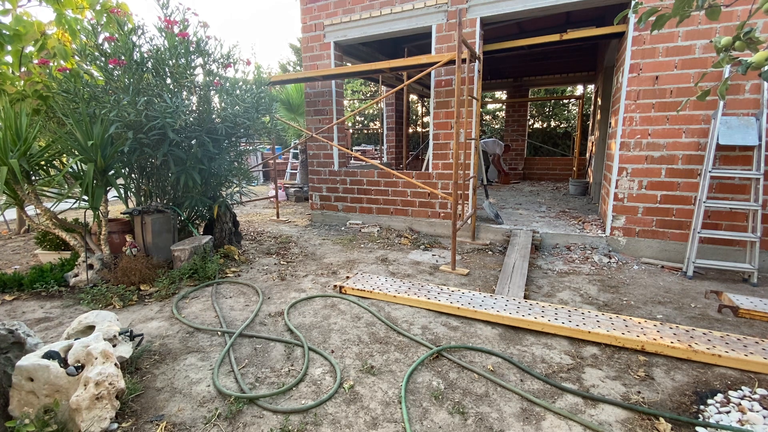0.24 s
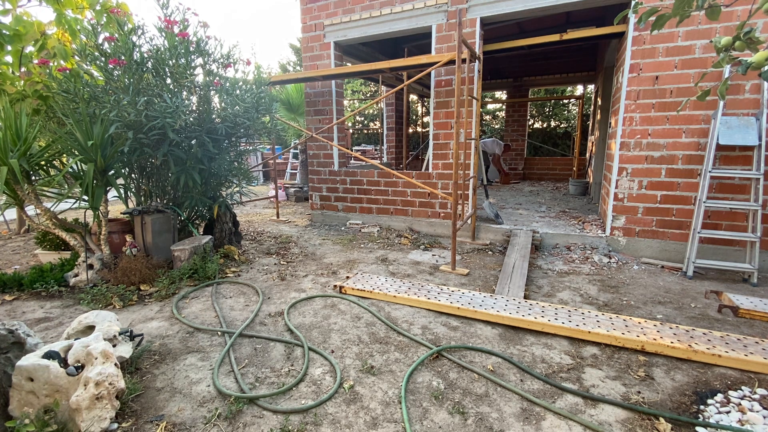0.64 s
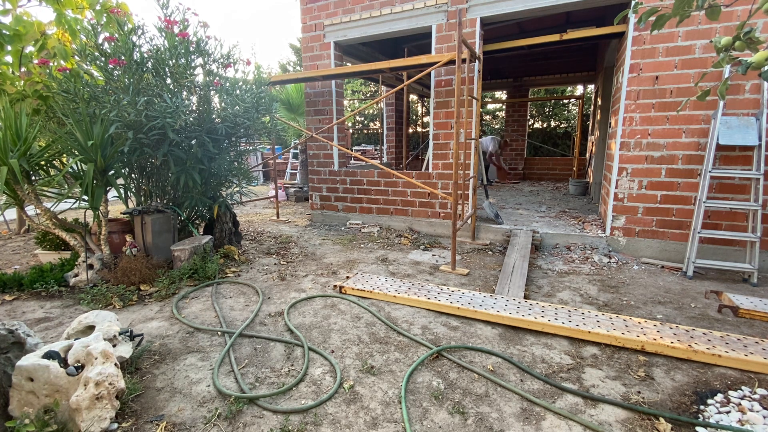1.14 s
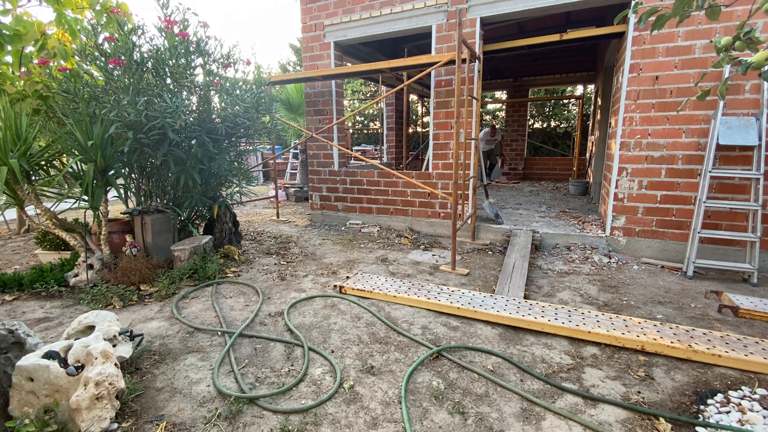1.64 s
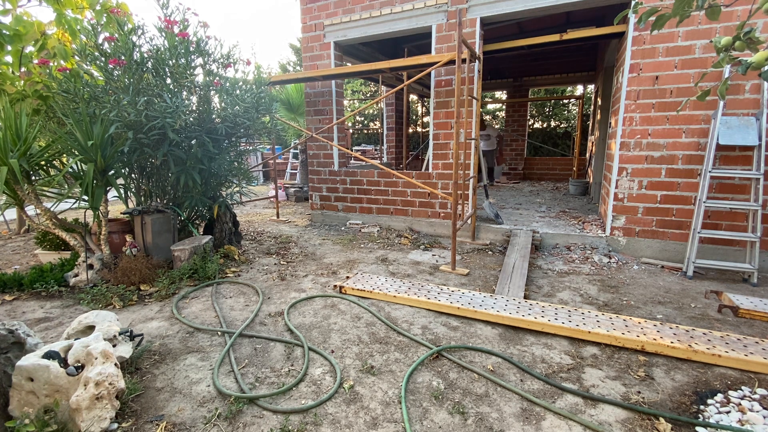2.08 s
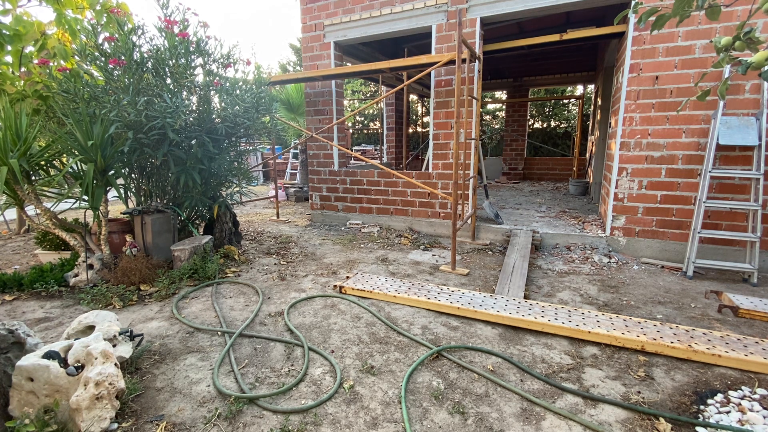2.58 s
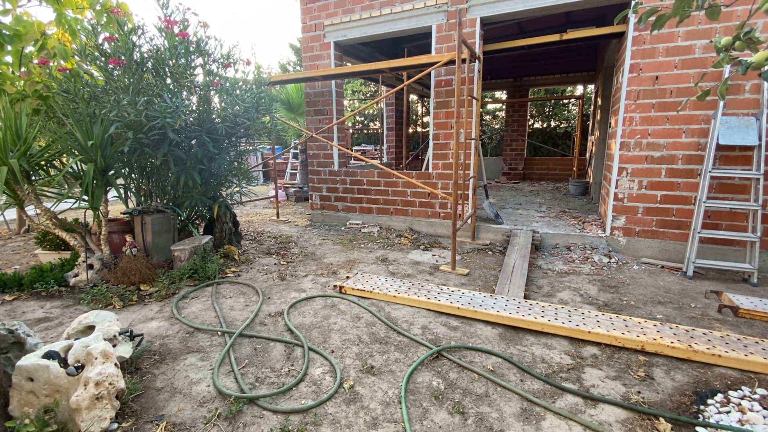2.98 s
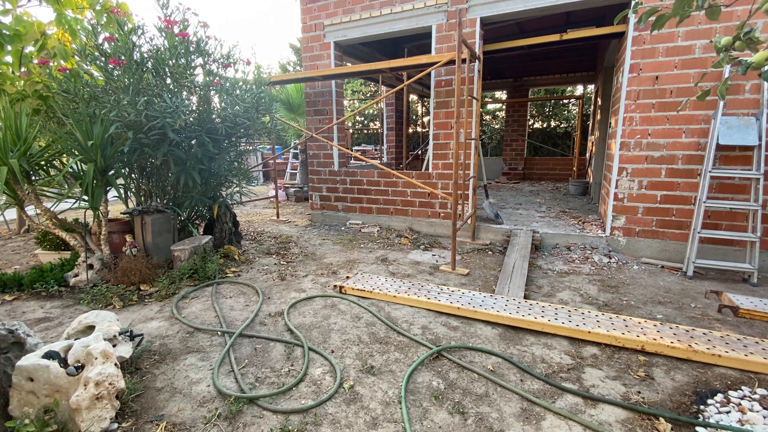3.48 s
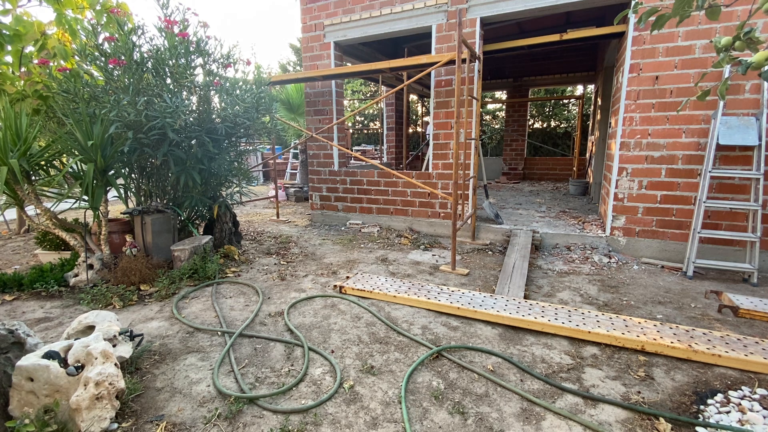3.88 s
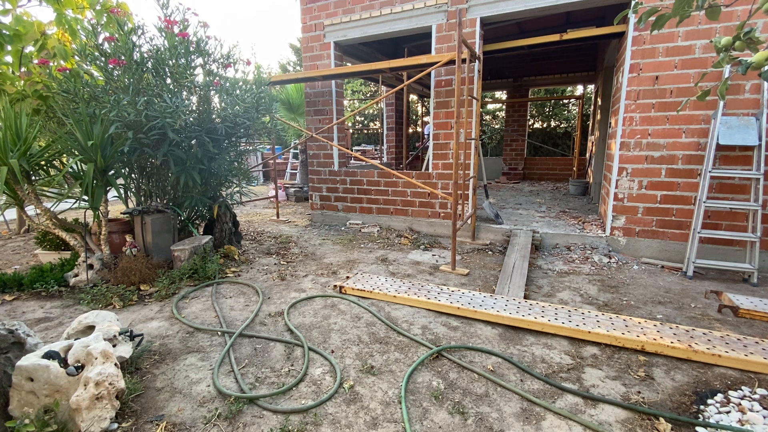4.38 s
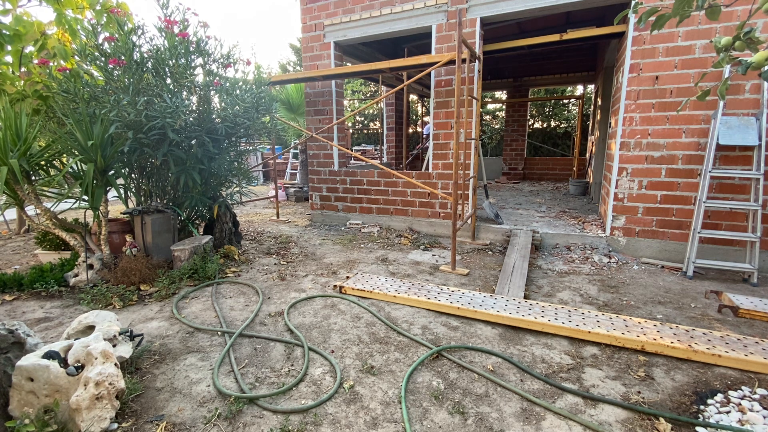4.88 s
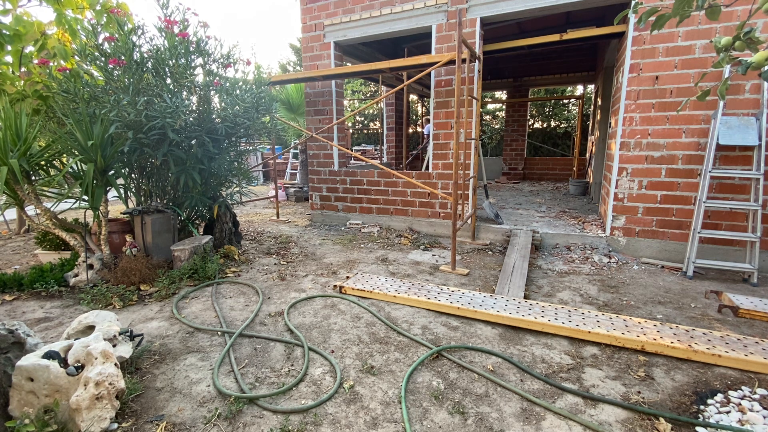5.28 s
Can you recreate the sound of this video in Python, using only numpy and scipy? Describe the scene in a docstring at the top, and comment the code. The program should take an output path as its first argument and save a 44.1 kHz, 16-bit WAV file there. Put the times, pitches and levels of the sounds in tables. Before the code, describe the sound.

Heard from a quiet yard, a steel part scrapes over concrete in the doorway of a bare brick house, clanks loudly, squeals briefly and knocks hollowly. Boots scuff grit with soft thuds. Deeper inside, a metal platform is shoved with a low rumble, then lands in a double clatter and rings out. Stereo microphones outside, short room reverberation.

```python
"""In the doorway of a bare brick house, heard from the yard, scaffolding parts are handled.
A steel part is dragged, clanks and knocks; grit scuffs on the concrete floor; then, deeper in the room,
a platform is shoved along and dropped with a double clatter. Impacts excite modal bodies with an impulse
and dying chatter, friction is a dense train of random slips, squeals are wavering sines, and the open
air is filtered noise; paths of direct sound, first bounces and room tail carry all but the air."""
import sys
import numpy as np
from scipy import signal
from scipy.fft import rfft, irfft, next_fast_len
from scipy.io import wavfile
from scipy.ndimage import uniform_filter1d

SR = 44100
rng = np.random.default_rng(int(sys.argv[2]) if len(sys.argv) > 2 else 0)


def output_pcm(signal):
    """Save a mono or channel-first signal as 16-bit PCM at the path in sys.argv[1].

    Samples are clipped to [-1, 1] before scaling.
    """
    pcm = np.clip(np.atleast_2d(signal).T, -1, 1) * 32767
    wavfile.write(sys.argv[1], SR, np.round(pcm).astype(np.int16))


N = 243856
TAPS = 16384  # length of an object's impulse response, samples
HZ, TIME = np.fft.rfftfreq(TAPS, 1 / SR), np.arange(N) / SR

# broad spectral colour of the steel part: [f/Hz, level/dB]
STEEL_COLOUR = [(60, -34), (300, -22.5), (520, -23), (850, -4.5), (1300, 0), (1700, -4.5), (2200, -8.5),
                (2600, -11.5), (3200, -12.5), (3800, -21), (4600, -19), (7300, -29.5), (10000, -42.5),
                (16000, -49)]
# vibration modes of the steel part: [f/Hz, width/Hz, level above the colour/dB]
STEEL_PART_MODES = [(648.5, 28, 6.8), (820, 16, 3), (856, 67, 6.2), (860, 20, 1.8), (1200, 27, 11),
                    (1293, 54, 8.9), (1609, 30, 8.2), (1756, 29, 13), (1986, 18, 4.3), (2570, 13, 14),
                    (2790, 26, 3), (3320, 89, 5.9), (7040, 470, 6.5)]
# colour of fine gritty hiss: [f/Hz, level/dB]
HISS_COLOUR = [(2000, -25.5), (5000, 0), (7500, -4.5), (11000, 0.5), (15500, -12.5), (17000, -19.5)]
HISS_LINGER = 0.85  # fall time of gritty hiss as a multiple of the push's own


def amp(db):
    """Level to gain: twenty decibels are a factor of ten in amplitude."""
    return 10 ** (np.asarray(db) / 20)


def evened(x):
    """Normalisation to unit root mean square."""
    return x / np.sqrt(np.mean(x ** 2) + 1e-20)


def packed(sound):
    """Energy normalisation: rms 1 if all the energy were packed into 10 ms."""
    return sound / np.linalg.norm(sound) * np.sqrt(SR / 100)


def read(points, hz):
    """Linear interpolation of a spectrum on a logarithmic frequency axis."""
    f, value = np.transpose(points)
    return np.interp(np.log(hz + 1), np.log(f + 1), value)


def add(mix, s, sound):
    """Superposition: lays a sound into the mix at time s."""
    part = mix[max(round(s * SR), 0):][:len(sound)]
    part += sound[:len(part)]


def causal(gain):
    """Minimum phase: folding the cepstrum gives the causal impulse response with this gain."""
    cepstrum = irfft(np.log(gain))
    cepstrum[..., 1:TAPS // 2] *= 2
    cepstrum[..., TAPS // 2 + 1:] = 0
    return irfft(np.exp(rfft(cepstrum)))


def body(colour, modes=(), tilt_db=0):
    """Modal resonance: Lorentzian peaks stand out of a broad colour, tilted in dB per octave."""
    peaks = 1 + sum(amp(db) ** 2 / (1 + (2 * (HZ - hz) / width) ** 2) for hz, width, db in modes)
    octaves = np.log2(np.clip(HZ, 250, 8000) / 1000)
    return causal(amp(read(colour, HZ) + tilt_db * octaves) * np.sqrt(peaks))


def blow(response, db, chatter, contact=0.32):
    """Impact excitation: one contact impulse and a decaying noise of smaller ones drive a body."""
    t = np.arange(SR // 10) / SR
    force = rng.standard_normal(len(t)) * np.exp(-t / max(chatter, 1e-5)) * (1 - np.exp(-t / 0.001)) * 0.16
    force[0] = contact
    sound = signal.fftconvolve(force, response)
    return amp(db) * packed(sound)


def ring(colour, modes, rise):
    """Free vibration: each mode decays at a rate set by its width, after a gradual onset."""
    t = TIME[:SR]
    sound = np.zeros(len(t))
    for hz, width, db in modes:
        decay = np.exp(-np.pi * width * t)
        sound += amp(read(colour, hz) + db) * decay * np.sqrt(width) * np.sin(2 * np.pi * hz * t)
    return packed(sound * (1 - np.exp(-t / rise)))


def rub(response, per_s, spread_db):
    """Friction noise: a dense random train of unequal slips drives a body, rms 1."""
    size = amp(spread_db * np.minimum(rng.exponential(1, N), 4))
    slips = size * rng.choice([-1., 1.], N) * (rng.random(N) < per_s / SR)
    return evened(signal.oaconvolve(slips, response)[:N])


def stroke(peak, rise, fall):
    """Exponential envelope of one push: 20 dB up in each rise time, 20 dB down in each fall time."""
    before = (peak - TIME) / max(rise, 0.005)
    after = (TIME - peak) / max(fall, 0.005)
    return 10 ** -np.maximum(before, after).clip(0, 10)


def strokes(rows, lingers):
    """Power addition of pushes: a gain curve per friction layer; lingers stretch each layer's fall."""
    curves = []
    for k, linger in enumerate(lingers):
        power = sum((amp(dbs[k]) * stroke(peak, rise, fall * linger)) ** 2
                    for peak, rise, fall, *dbs in rows)
        curves.append(np.sqrt(power))
    return curves


def pair(two):
    """Interchannel coherence: mixing two unrelated signals makes a microphone pair, most alike in the bass."""
    # correlation of diffuse sound at the microphones: [f/Hz, coherence]
    likeness = [(80, 0.89), (350, 0.6), (900, -0.55), (2000, 0.19), (4500, 0.18), (12000, -0.63)]
    size = two.shape[1]
    a, b = rfft(two)
    same = np.clip(read(likeness, np.fft.rfftfreq(size, 1 / SR)), -1, 1)
    mid, side = a * np.sqrt((1 + same) / 2), b * np.sqrt((1 - same) / 2)
    return irfft([mid + side, mid - side], size)


def reflections(shrink, onset):
    """Diffuse reverberation: noise decays by frequency band; shrink scales every decay time."""
    # reverberation time of the brick room at shrink 1: [f/Hz, t60/s]
    decay_times = [(100, 0.86), (400, .52), (1500, 0.39), (4000, 0.39), (12000, 0.061)]
    hz, t, z = signal.stft(pair(rng.standard_normal((2, SR))), SR, nperseg=256)
    decay = amp(-60 * t / (shrink * read(decay_times, hz)[:, None]))
    tail = signal.istft(z * decay, SR, nperseg=256)[1]
    tail = tail * (1 - np.exp(-np.arange(tail.shape[1]) / SR / onset))
    power = abs(rfft(tail, TAPS * 4)[:, 1000:4000]) ** 2  # about 0.7 to 2.7 kHz
    return tail / np.sqrt(power.mean())


def place(x, direct_db, early_db, late_db, right, lag_ms):
    """Room acoustics: direct sound, first bounces and tail, with level and time differences in stereo."""
    # left minus right level at right = 1: [f/Hz, level/dB]
    doorway = [(100, -3), (400, -6), (700, -4), (1200, -6), (1900, -0.5), (4500, 2)]
    early = amp(early_db) * reflections(shrink=0.15, onset=0.003)
    paths = early + amp(late_db) * reflections(shrink=1, onset=0.0085)
    paths[:, 0] += amp(direct_db)
    # the many paths smear the sound in time but leave its colour even
    power = uniform_filter1d(abs(rfft(paths, TAPS)) ** 2, size=19, axis=1)
    total = amp(direct_db) ** 2 + amp(early_db) ** 2 + amp(late_db) ** 2
    paths = signal.fftconvolve(paths, causal(np.sqrt(total / (power + 1e-9))), axes=1)
    size = next_fast_len(N + 2 * SR, True)
    hz = np.fft.rfftfreq(size, 1 / SR)
    # half of each difference goes to either channel; the left lags
    lean = amp(right * read(doorway, hz) / 2) * np.exp(-1j * np.pi * hz * lag_ms / 1000)
    return irfft(rfft(x, size) * rfft(paths, size) * np.array([lean, 1 / lean]), size)[:, :N]


def air():
    """Broadband noise filtering: quiet outdoor air over a soft low rumble that swells and ebbs."""
    # colour of the outdoor air: [f/Hz, level/dB]
    air_colour = [(15, -42), (27, -18.5), (42, 0), (65, -5.5), (130, -3), (250, -10), (380, -13),
                  (500, -10.5), (900, -15.5), (2000, -22.5), (7300, -26.5), (16000, -38.5)]
    # relative level of the low rumble: [t/s, level/dB]
    low_level = [(0.0, -68), (0.68, -62), (1.02, -78), (2.39, -80.5), (2.71, -91), (3.62, -73.5),
                 (3.88, -56), (4.42, -69.5), (4.77, -65.5), (5.02, -58.5), (5.53, -64.5)]

    def wash(colour):
        """Spectral shaping of a noise pair, rms 1."""
        noise = pair(rng.standard_normal((2, N)))
        return evened(signal.fftconvolve(noise, body(colour)[None], axes=1)[:, :N])

    # [f/Hz, level/dB]
    low = wash([(15, -38.0), (25, -22.5), (40, -14.5), (62, -3.0), (110, -7.0), (250, -17), (1000, -54.0)])
    swell = amp(np.interp(TIME, *np.transpose(low_level)))
    return amp(-76) * wash(air_colour) + amp(3.5) * swell * low


def steel_slide():
    """Sliding friction: the steel part scrapes over concrete and sings in its modes."""
    # drags: [peak t/s, 20 dB rise/s, 20 dB fall/s, relative scrape level/dB, relative hiss level/dB]
    drags = [(.056, .08, 0.083, -49, -58.5), (.155, .07, 0.19, -61.5, -60), (.41, 0.089, 0.05, -48.5, -56),
             (.468, .03, 0.089, -52.5, -55), (.72, .12, 0.25, -61, -66.5), (.85, .2, 0.086, -56, -59),
             (.89, .05, 0.14, -54.5, -65), (1.025, .06, 0.1, -57, -80)]
    # colour of the scrape: [f/Hz, level/dB]
    scrape_colour = [(50, -11.5), (150, -2), (300, -3.5), (500, -3), (800, -1), (1300, -1.5), (2000, -4.5),
                     (3400, -10), (4500, -6.5), (6000, -13), (8000, -15.5), (16000, -35)]
    # modes of the scrape: [f/Hz, width/Hz, level above the colour/dB]
    scrape_modes = [(754, 25, 12), (792.6, 20, 12), (895.3, 21, 7), (1305, 9.9, 12), (1910, 14, 9),
                    (2456, 11, 3), (2700, 47, 10), (3375, 22, 8), (4050, 46, 8.7), (4370, 100, 1.7),
                    (7070, 440, 3.1)]
    scrape, hiss = strokes(drags, (1, HISS_LINGER))
    out = amp(5.5) * scrape * rub(body(scrape_colour, scrape_modes), per_s=3000, spread_db=4)
    out += hiss * rub(body(HISS_COLOUR), per_s=10000, spread_db=4.5)
    return place(out, direct_db=-6.5, early_db=-1.5, late_db=-12, right=0.83, lag_ms=0.096)


def bounces(s, db):
    """Inelastic rebound: three weaker contacts (t/s, level/dB) follow a hard blow at shrinking gaps."""
    first_gap_s, gap_ratio, loss_db = 0.018, 0.55, 11.5
    gaps = first_gap_s * gap_ratio ** np.arange(3)
    return [(again, db - loss_db) for again in s + np.cumsum(gaps)]


def steel_blows():
    """Impact and modal decay: the steel part clanks in the doorway, bounces, rattles and rings on."""
    # blows: [t/s, level/dB, brightness/(dB per octave), chatter decay/s, free ring relative to blow/dB]
    clanks = [(0.047, -44.5, -2, 0.008, -13), (0.3597, -46, -10, 0.0077, -8.5),
              (0.37, -44, -3.5, .012, -10), (0.463, -49, 5, 0.0073, -10.5),
              (0.541, -28, -2.5, 0.0072, -11.5), (0.5484, -15, 1.5, 0.0075, -9.5),
              (0.819, -40.5, -1.5, 0.043, -19), (0.879, -31.5, 1.5, 0.032, -11.5)]
    hard_db = -23  # a blow above this level bounces
    out, ringing = np.zeros((2, N))
    for s, db, tilt_db, chatter, ring_db in clanks:
        add(out, s, blow(body(STEEL_COLOUR, STEEL_PART_MODES, tilt_db), db, chatter))
        add(ringing, s, amp(db + ring_db) * ring(STEEL_COLOUR, STEEL_PART_MODES, rise=0.0011))
        if db > hard_db:
            for again, again_db in bounces(s, db):
                response = body(STEEL_COLOUR, STEEL_PART_MODES, tilt_db=-0.25)
                add(out, again, blow(response, again_db, chatter=0.002))
    return (place(out, direct_db=-2.5, early_db=-7.5, late_db=-11.0, right=1.15, lag_ms=0.09)
            + place(ringing, direct_db=0, early_db=-17, late_db=-15, right=1.4, lag_ms=0.14))


def squeals():
    """Stick-slip oscillation: sliding metal catches and sings briefly on one wavering pitch."""
    # squeals: [t/s, length/s, level/dB, starting f/Hz, closing f/Hz], centres of the waver and flutter
    squeal_notes = [(0.384, .11, -52, 2394, 2416), (0.683, 0.24, -54.5, 2370, 2380),
                    (2.672, 0.06, -66.5, 9630, 9700), (3.739, 0.23, -69, 1274, 1263),
                    (4.467, 0.087, -76.5, 1800, 1670)]
    out = np.zeros(N)
    for s, length, db, start_hz, end_hz in squeal_notes:
        size = int(length * SR)
        waver, flutter = (evened(uniform_filter1d(noise, size=300))[:size]
                          for noise in rng.standard_normal((2, N)))
        hz = np.linspace(start_hz, end_hz, size) * (1 + 0.009 * waver)
        swell = amp(db + 2.5 * flutter) * signal.windows.tukey(size, 0.5)
        add(out, s, swell * np.sin(2 * np.pi * np.cumsum(hz) / SR))
    return place(out, direct_db=-2.5, early_db=-10.5, late_db=-8.5, right=0.55, lag_ms=0.073)


def tube_knocks():
    """Damped resonance: the open end of a tube gives a short hollow note over a fainter tap."""
    # knocks: [t/s, level/dB, f/Hz, t60/s]
    knocks = [(.715, -39, 864, 0.036), (.883, -36, 810, 0.13), (0.97, -50, 1290, 0.07),
              (1.007, -31.5, 1010, 0.028), (1.032, -45, 1033, 0.052), (1.055, -48.5, 1066, 0.062)]
    out = np.zeros(N)
    for s, db, hz, t60 in knocks:
        width = np.log(1000) / np.pi / t60  # bandwidth in Hz that decays 60 dB in t60
        add(out, s, amp(db) * ring(STEEL_COLOUR, [(hz, width, 0)], rise=0.004))
        tap = body(STEEL_COLOUR, STEEL_PART_MODES, tilt_db=3.0)
        add(out, s, blow(tap, db - 9.0, chatter=0.0048))
    return place(out, direct_db=-3.5, early_db=-7.5, late_db=-14, right=1.0, lag_ms=0.08)


def grit():
    """Granular friction: scuffs are dense trains of slips, with single stones snapping as impacts."""
    # scuffs: [peak t/s, 20 dB rise/s, 20 dB fall/s, relative crunch level/dB, relative hiss level/dB]
    scuffs = [(1.238, 0.045, 0.39, -55.5, -77), (1.315, 0.11, 0.14, -57, -68), (1.38, .08, .1, -70, -88),
              (1.54, .1, 0.11, -67, -69.5), (1.84, 0.029, .1, -56.5, -67), (1.885, 0.076, 0.13, -51.5, -63),
              (2.04, 0.14, 0.19, -66.5, -75.5), (2.143, .012, 0.14, -61.5, -84),
              (2.247, 0.014, .25, -67.5, -79.5), (2.367, 0.13, 0.13, -58.5, -75.5),
              (2.485, .06, .2, -67, -75), (2.63, .15, 0.16, -98, -80), (3.07, 0.06, 0.2, -56, -71),
              (3.25, 0.077, 0.11, -72, -80)]
    # colour of crunching grit: [f/Hz, level/dB]
    crunch_colour = [(60, -19.5), (230, -5.5), (450, -6.5), (850, -2.5), (1400, -1), (2200, -3),
                     (3300, -5.5), (5200, -13), (7000, -15), (16000, -79)]
    # stones snapping underfoot: [t/s, level/dB, f/Hz]
    stones = [(1.229, -52.5, 1600), (1.339, -53.5, 1660), (1.364, -48.5, 1526), (1.373, -52.5, 1310),
              (1.396, -52, 1330), (1.636, -64.5, 1590), (1.835, -55, 1920), (1.869, -48, 2100),
              (1.971, -57.5, 1480), (2.044, -58.5, 2480), (2.084, -62.5, 1580), (2.137, -52.5, 1667),
              (2.240, -56.5, 2100), (2.474, -57.5, 1870), (3.063, -55, 2200)]
    crumble_s = 0.0041  # decay of each stone's chatter
    crunch, hiss = strokes(scuffs, (1, HISS_LINGER))
    out = amp(-2) * crunch * rub(body(crunch_colour), per_s=900, spread_db=2.0)
    out += amp(4.5) * hiss * rub(body(HISS_COLOUR), per_s=2300, spread_db=4.0)
    snaps = np.zeros(N)
    for s, db, hz in stones:
        add(snaps, s, blow(body(crunch_colour, [(hz, 500, 11)]), db, crumble_s, contact=1.0))
    return (place(out, direct_db=-6.5, early_db=2.5, late_db=-26, right=0.44, lag_ms=0.064)
            + place(snaps, direct_db=-5.0, early_db=-2.5, late_db=-7.0, right=1.0, lag_ms=0.055))


def footfalls():
    """Soft impact: boots press on the slab with a dull, bass-heavy thud."""
    # footfalls: [t/s, level/dB]
    steps = [(1.675, -59), (1.861, -51.5), (2.272, -62), (2.471, -62.5), (3.088, -54.5), (3.305, -71)]
    # colour of the thud: [f/Hz, level/dB]
    thud_colour = [(20, -51), (45, -1), (70, 3), (110, -17), (230, -14), (500, -22), (2000, -44)]
    out = np.zeros(N)
    for s, db in steps:
        add(out, s, blow(body(thud_colour), db, chatter=0.022))
    return place(out, direct_db=-7, early_db=-0.5, late_db=-2, right=0.23, lag_ms=0.061)


def platform_shove():
    """Friction and impact: the shoved platform rumbles, bumps, rasps in its modes and hisses on grit."""
    # shoves and skids: [peak t/s, 20 dB rise/s, 20 dB fall/s before lingering,
    # relative rumble level/dB, relative rasp level/dB, relative hiss level/dB]
    shoves = [(3.487, .012, .12, -69, -69.5, -95), (3.58, 0.072, 0.14, -43, -54.5, -69.5),
              (3.77, 0.072, 0.13, -68, -71, -83), (3.94, 0.12, 0.094, -41.5, -47, -65),
              (3.985, 0.06, .11, -47, -49.5, -61), (4.51, .12, .15, -71, -80, -100),
              (4.585, .02, 0.055, -70.5, -70, -88), (4.652, 0.017, 0.062, -73, -63.5, -77.5),
              (4.79, 0.081, 0.06, -71, -58.5, -68.5), (4.821, 0.01, .11, -48.5, -35, -55.5),
              (4.918, 0.042, .11, -38.5, -36, -59.5), (5.35, 0.082, 0.13, -54.5, -63, -88)]
    # colour of the rumble: [f/Hz, level/dB]
    rumble_colour = [(30, -48), (65, -14), (110, 2), (160, 6.5), (200, -2.5), (250, 1.5), (320, -3.5),
                     (420, 3), (560, -16), (900, -12), (2000, -43), (8000, -76)]
    # colour of the rasp on the floor: [f/Hz, level/dB]
    rasp_colour = [(100, -11.5), (500, -0.5), (900, 4), (1300, 2), (2000, -8), (3200, -9.5), (5000, -13),
                   (7000, -14), (16000, -76)]
    # modes of the rasp: [f/Hz, width/Hz, level above the colour/dB]
    rasp_modes = [(868, 12, 6.3), (1290, 16.4, 9.8), (1877, 42, 11.7), (2140, 10, 15), (2670, 41, 10),
                  (3410, 44, 8.1), (4417, 180, 9.5), (5000, 46, 1.6), (6470, 75, 4.8)]
    # bumps over the floor: [t/s, level/dB, chatter decay/s]
    floor_bumps = [(3.482, -58, 0.025), (3.575, -55, 0.018), (3.918, -40.5, 0.013), (3.932, -37, 0.015),
                   (3.967, -41.5, 0.013)]
    # colour of the bumps: [f/Hz, level/dB]
    bump_colour = [(40, -38), (100, -15), (200, -8), (420, 5), (560, -6), (850, 0), (1050, -10), (1250, -1),
                   (1500, -21), (2200, -16.5), (3000, -37), (5000, -31), (16000, -51)]
    # low modes, damped by the floor: [f/Hz, width/Hz, level above the colour/dB]
    bump_modes = [(107, 14, 3), (155, 9.5, 14.5), (254, 10, -2), (337, 22.6, -1), (404, 20, 0)]
    rumble_linger = 1.65  # fall time as a multiple of the push's own
    rumble, rasp, hiss = strokes(shoves, (rumble_linger, 1, HISS_LINGER))
    out = amp(-2) * rumble * rub(body(rumble_colour), per_s=400, spread_db=4)
    out += amp(0.5) * rasp * rub(body(rasp_colour, rasp_modes), per_s=700, spread_db=4.0)
    out += amp(5.5) * hiss * rub(body(HISS_COLOUR), per_s=2500, spread_db=0.0)
    bumps = np.zeros(N)
    for s, db, chatter in floor_bumps:
        add(bumps, s, blow(body(bump_colour, bump_modes), db, chatter))
    return (place(out, direct_db=-7.0, early_db=0.0, late_db=-12, right=0.45, lag_ms=0.025)
            + place(bumps, direct_db=-1.0, early_db=-4.5, late_db=-1.5, right=0.44, lag_ms=0.026))


def platform_blows():
    """Impact and modal decay: the platform lands end by end and rings on; its hooks add a bright edge."""
    # blows: [t/s, level/dB, brightness/(dB per octave), chatter decay/s, free ring relative to blow/dB]
    drops = [(4.73, -57, 3, 0.027, -15.5), (4.786, -51.5, 9, 0.028, -21), (4.822, -30.5, -3, 0.0084, -8),
             (4.842, -32.5, -3.5, 0.011, -1), (4.877, -39, -9, 0.019, 1.5), (4.912, -25.5, 0.5, 0.012, -8),
             (4.932, -33.5, -4, 0.0066, -26), (4.975, -38.5, -3.5, 0.0034, -6),
             (5.319, -59.5, -2, .03, -19), (5.388, -66.5, 0, 0.0039, -17)]
    # broad colour of the platform: [f/Hz, level/dB]
    deck_colour = [(30, -37), (70, -22), (110, -2.5), (190, -19), (400, 5.5), (620, 0), (850, 2),
                   (1050, -0.5), (1300, 4), (2200, 0.5), (3200, -5.5), (4700, -10.5), (6500, -27),
                   (10000, -33.5), (16000, -44)]
    # modes of the platform: [f/Hz, width/Hz, level above the colour/dB]
    deck_modes = [(103.3, 1.67, 11.5), (147, 8.1, 7.65), (241.3, 3.8, 18), (421.6, 8.6, 7.7),
                  (863, 6.9, 7.9), (813, 9, 16.7), (903, 32, 8.7), (1160, 9.3, 7.3), (1234, 15, 9.8),
                  (1316, 14, 9.6), (1590, 33, 7.1), (1730, 20, 6.2), (1925, 25, 2.7), (2003, 5.6, 4.3),
                  (2230, 32, 7.7), (2720, 41, 3.7)]
    # strikes of its steel hooks: [t/s, level/dB, chatter decay/s]
    hook_strikes = [(4.8144, -31.5, 0.0072), (4.905, -31, 0.017)]
    # bright colour of the hooks: [f/Hz, level/dB]
    hook_colour = [(100, -30), (800, -9), (1800, -5), (2800, 2), (3700, -6), (4700, -5.5), (5600, -23),
                   (8000, -28), (16000, -37)]
    out, ringing, hooks = np.zeros((3, N))
    for s, db, tilt_db, chatter, ring_db in drops:
        add(out, s, blow(body(deck_colour, deck_modes, tilt_db), db, chatter))
        add(ringing, s, amp(db + ring_db) * ring(deck_colour, deck_modes, rise=0.0098))
    for s, db, chatter in hook_strikes:
        add(hooks, s, blow(body(hook_colour), db, chatter))
    return (place(out, direct_db=-3.5, early_db=-1, late_db=-3, right=0.072, lag_ms=0.0055)
            + place(ringing, direct_db=0.0, early_db=-1.5, late_db=-16, right=0.21, lag_ms=0.0062)
            + place(hooks, direct_db=-7.0, early_db=-2.5, late_db=-12, right=0.1, lag_ms=0.0069))


def scene():
    """Linear superposition of all sources."""
    steel = steel_slide() + steel_blows() + squeals() + tube_knocks()
    floor = grit() + footfalls()
    platform = platform_shove() + platform_blows()
    return air() + steel + floor + platform


def record(dry):
    """Band limiting: the microphones' bass roll-off at 38 Hz, then a steep low-pass at 15.9 kHz."""
    heard = signal.sosfilt(signal.butter(2, 38, "highpass", fs=SR, output="sos"), dry)
    low_pass = signal.firwin(511, 15900, window=("kaiser", 9), fs=SR)
    return signal.oaconvolve(heard, low_pass[None], "same")


dry = scene()
out = record(dry)
output_pcm(out)
```